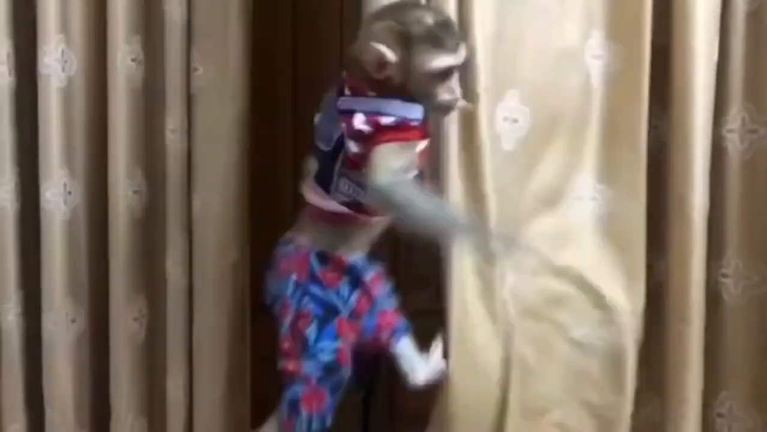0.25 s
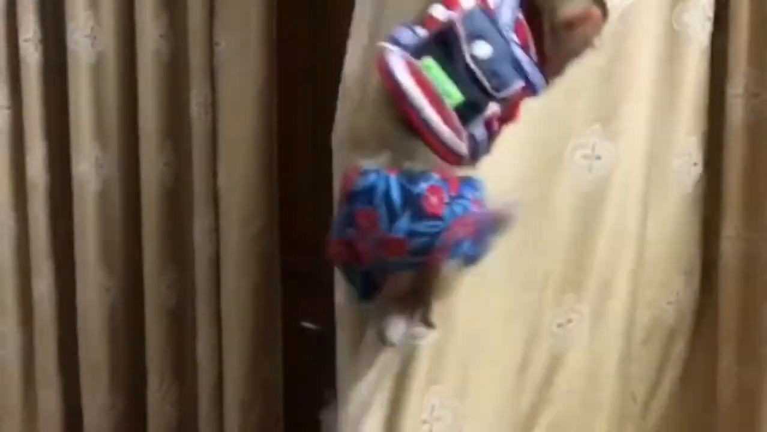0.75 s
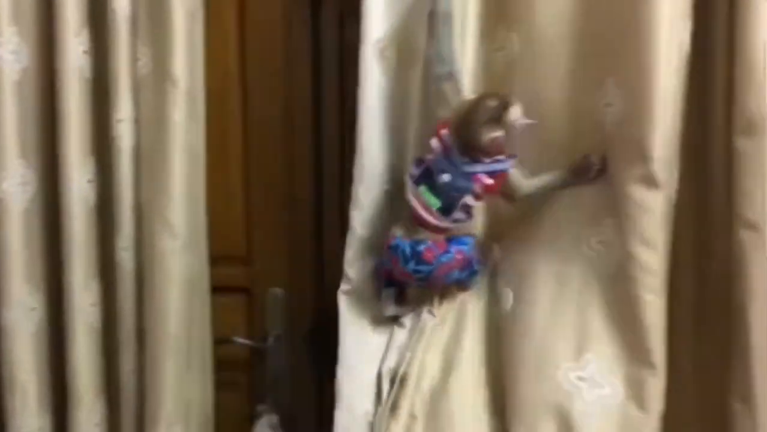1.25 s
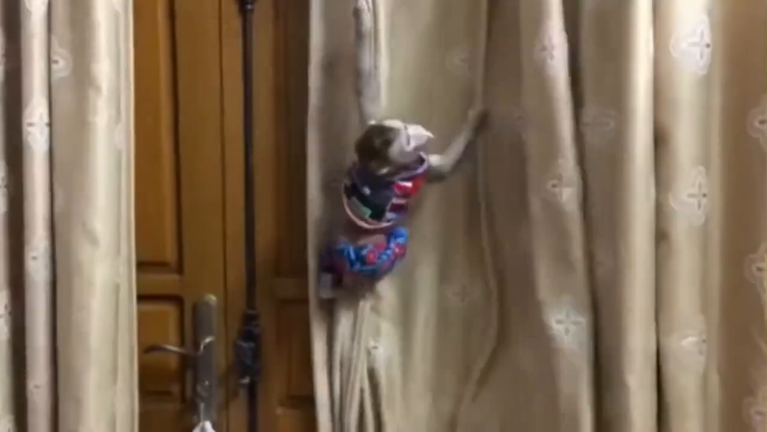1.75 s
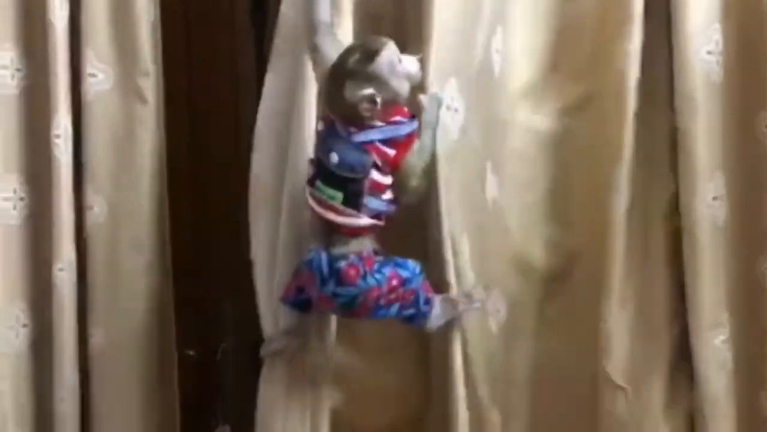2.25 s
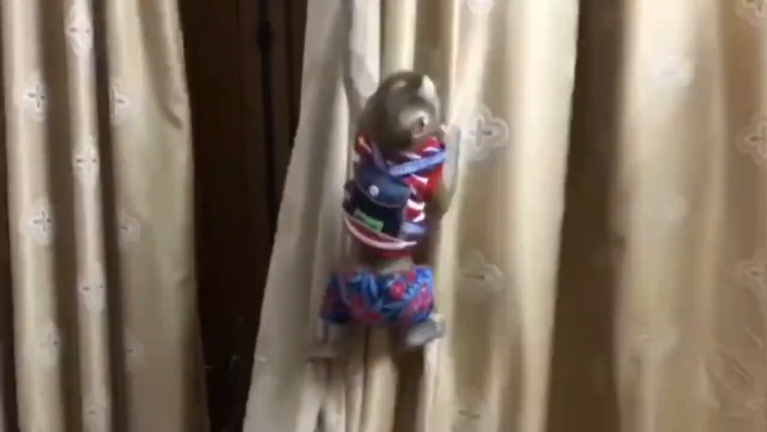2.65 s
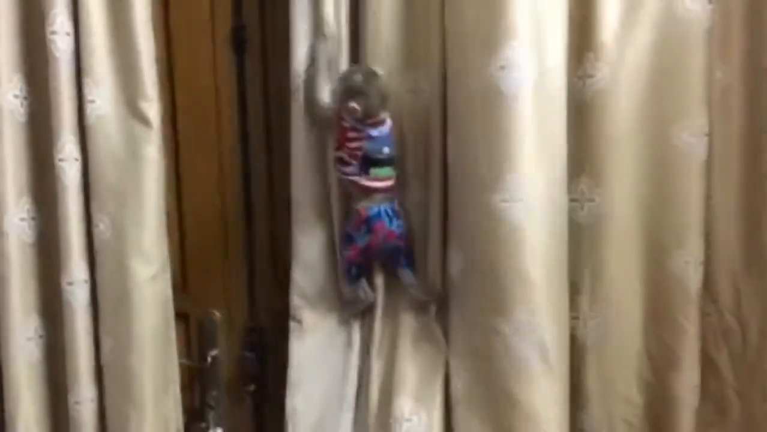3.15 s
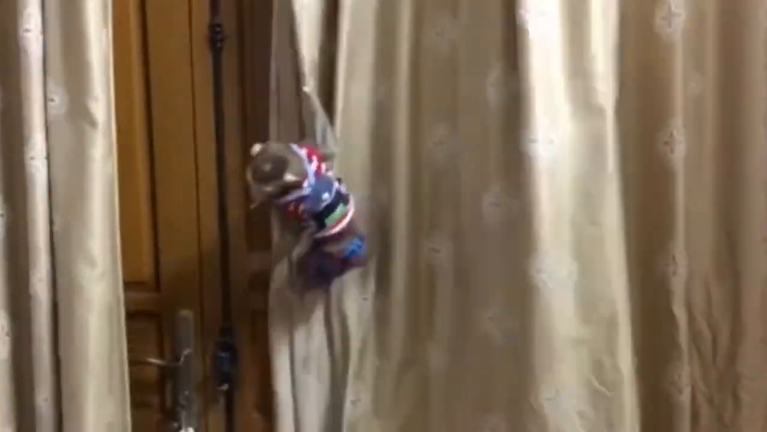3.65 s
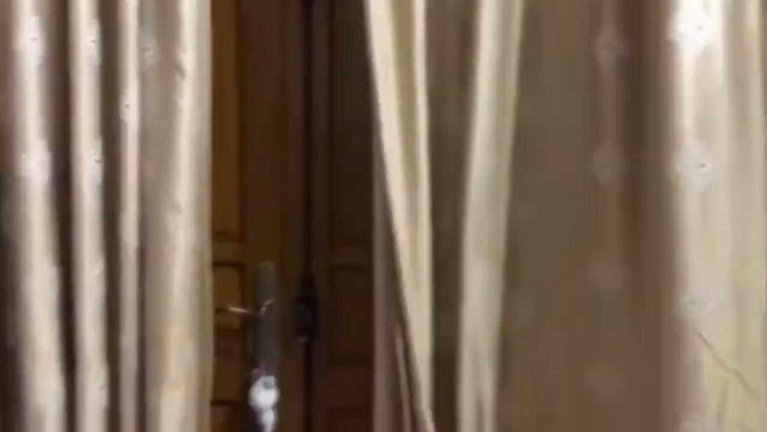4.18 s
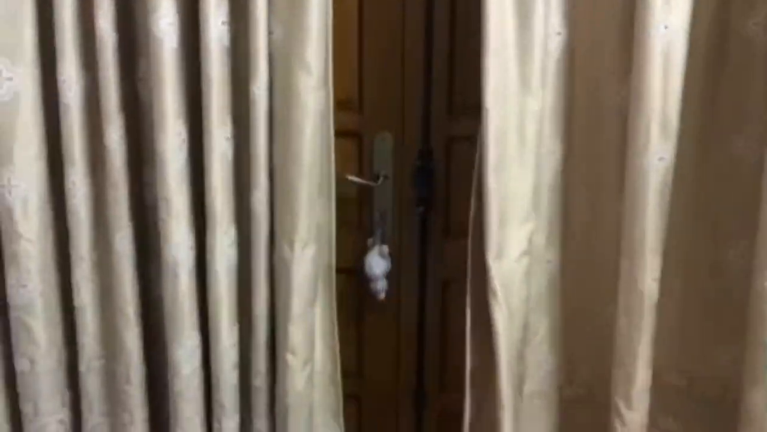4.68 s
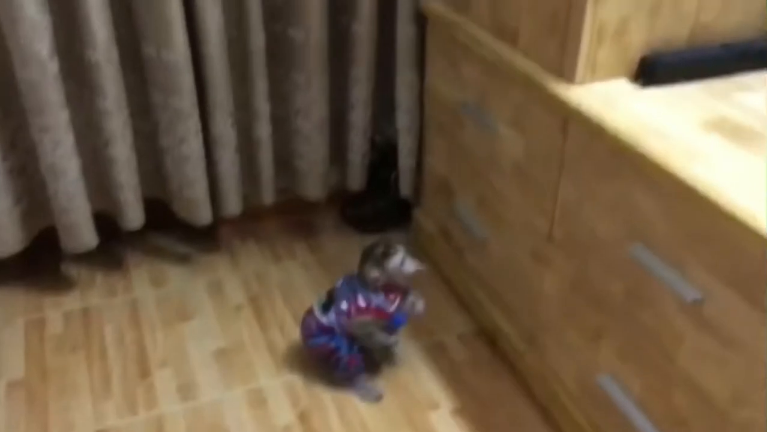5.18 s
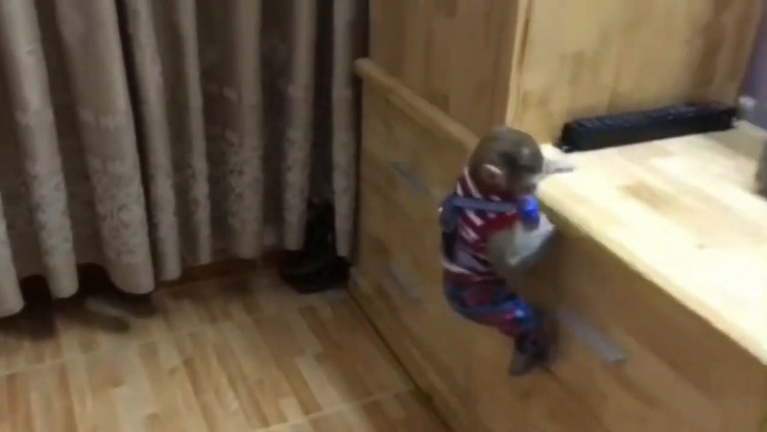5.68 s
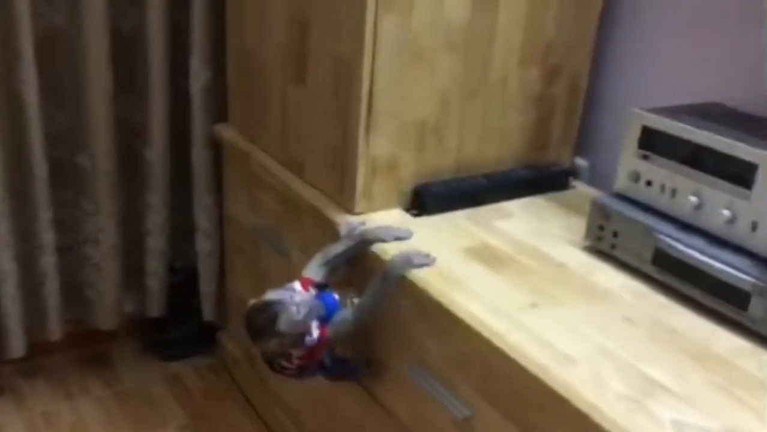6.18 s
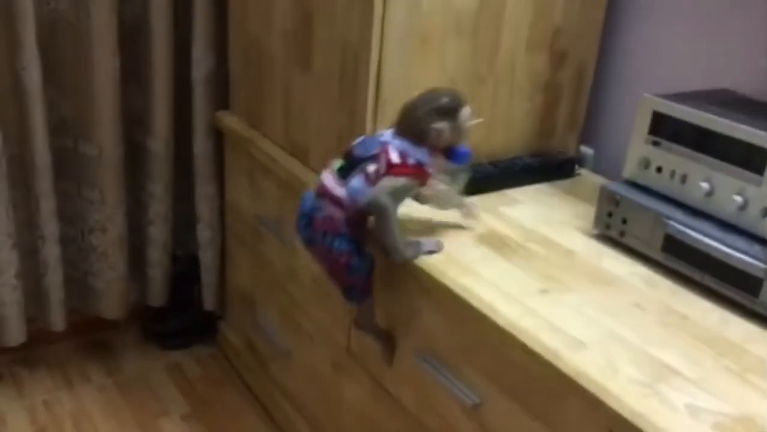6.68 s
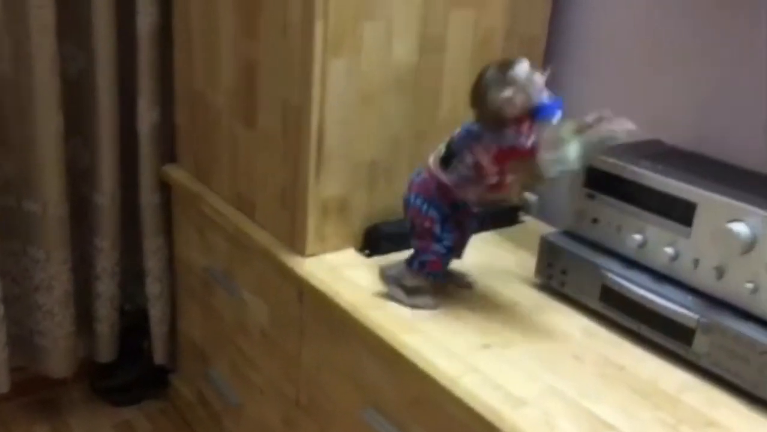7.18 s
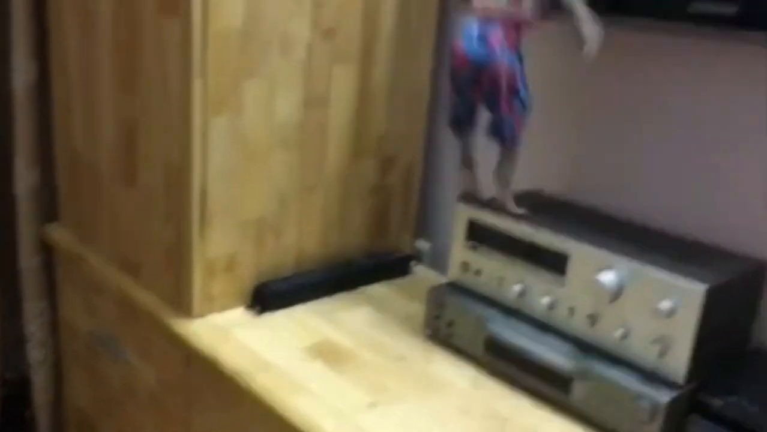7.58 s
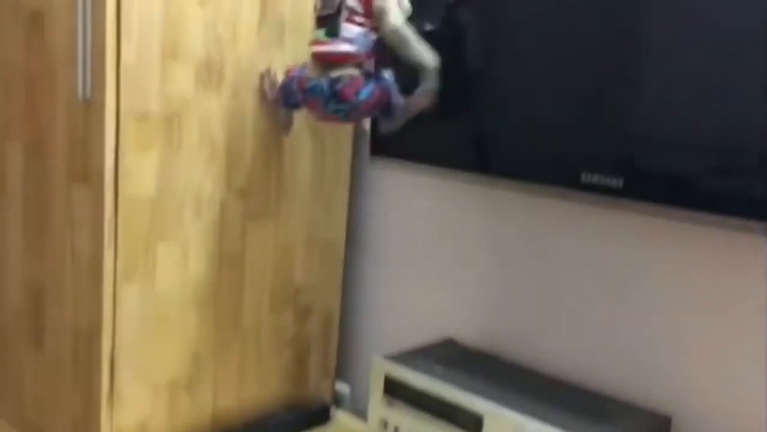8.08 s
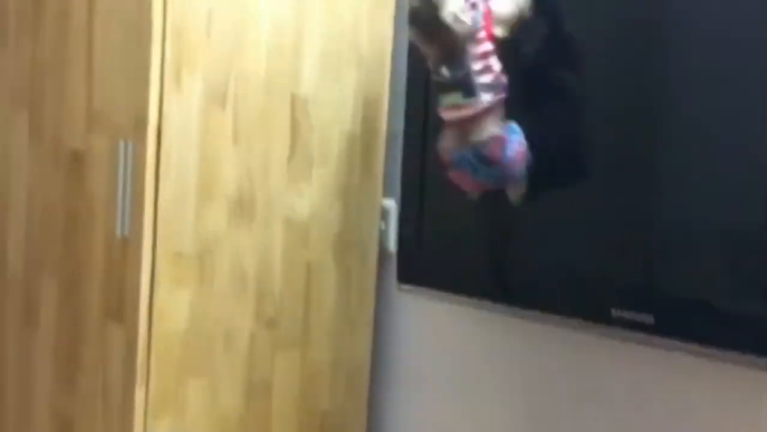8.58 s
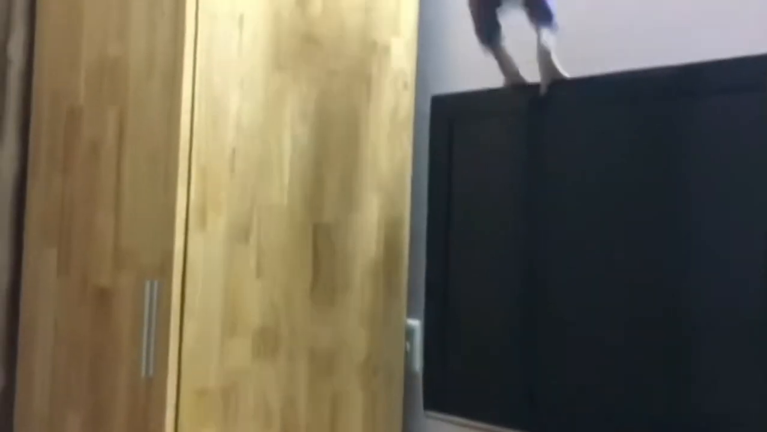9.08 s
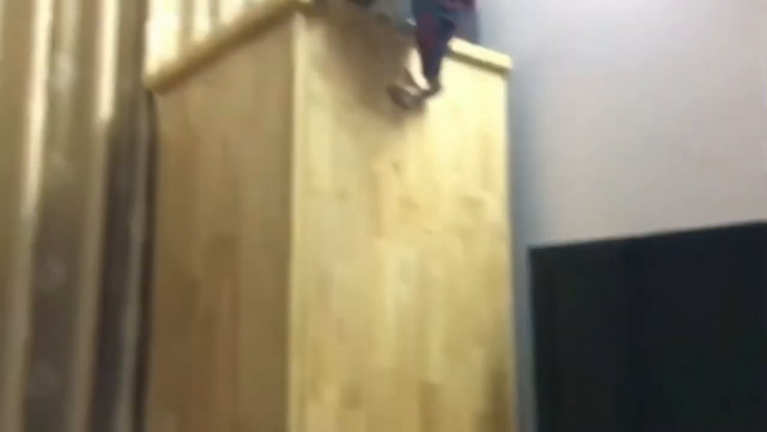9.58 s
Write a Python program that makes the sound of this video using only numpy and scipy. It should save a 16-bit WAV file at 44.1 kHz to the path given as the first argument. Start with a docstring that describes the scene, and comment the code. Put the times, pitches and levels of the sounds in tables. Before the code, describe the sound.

Deep muffled door thumps, a hard floor smack, then light claw ticks, wood knocks and boxy metal bangs over low hum in a live room.

```python
"""A small monkey swings on a curtain against a wooden door, drops to the floor, then climbs a cabinet and a metal case.
Soft blows ring decaying body modes and slap with filtered noise; claws tick, hollow parts knock and cloth rustles.
Shaken woodwork rumbles on, a hard-walled room answers with noise tails, and an appliance hums under it all.
At 4.833 s the level drops at once and comes back in a short fade."""
import sys
import numpy as np
from scipy import signal
from scipy.fft import rfft, irfft
from scipy.io import wavfile
from scipy.ndimage import uniform_filter1d

SR = 44100
rng = np.random.default_rng(int(sys.argv[2]) if len(sys.argv) > 2 else 0)


def put_to_file(sound):
    """Save the sound as 16-bit audio at rate SR, in the file named by the first command-line argument."""
    columns = np.atleast_2d(sound).T  # one column per channel
    safe = np.clip(columns, -1, 1)
    whole_steps = np.round(safe * 32767)
    wavfile.write(sys.argv[1], SR, whole_steps.astype(np.int16))


N = 433944


def undb(db):
    """Decibels to amplitude."""
    return 10 ** (np.asarray(db) / 20)


def unit(x):
    """Scales a signal to an rms of 1."""
    return x / np.sqrt(np.mean(x ** 2))


def band(x, hz, width):
    """Resonance with gain 1 at the centre; never wider than five times its centre."""
    b, a = signal.iirpeak(min(hz, .45 * SR), max(hz / width, .2), fs=SR)
    return signal.lfilter(b, a, x)


def curve(rows):
    """Amplitude over time, joining the listed levels by straight lines in dB."""
    time_s, level_db = np.transpose(rows)
    return undb(np.interp(np.arange(N) / SR, time_s, level_db))


def walk(rate):
    """Random levels held 1 / rate s and slewed; spread near 1."""
    hold = int(SR / rate)
    steps = np.repeat(rng.standard_normal(N // hold + 1), hold)
    return uniform_filter1d(steps, hold)[:N]


def fade(t, t60):
    """Exponential decay that falls 60 dB in t60 s."""
    return np.exp(-np.log(1000) * t / np.clip(t60, .003, 3))


def add(out, start_s, x, peak_db):
    """Places a sound at start_s with the given peak."""
    i = int(start_s * SR)
    out[i:i + len(x)] += (x * undb(peak_db) / np.abs(x).max())[:N - i]


# ringing modes of each struck body: pitch_hz, level_db, t60_s
DOOR = [(50.8, -7, 0.23), (67.3, -0.5, 0.41), (96, -20.5, 0.97), (148, -8, 0.11), (191.8, -2.5, 0.078),
        (294, 0.5, 0.035), (431, -14.5, 0.13), (594, -4, 0.066)]
FLOOR = [(62, -6, 0.27), (93.4, 1, 0.17), (170.6, -4.5, 0.15), (237.4, 1, 0.057), (309, -7, 0.059),
         (472, -4, 0.033), (627, -4, 0.023)]
CABINET = [(60.7, -9, 0.21), (96.5, -4.5, 0.17), (161.3, 0.5, 0.095), (227.7, -1, 0.12),
           (320.4, -3.5, 0.079), (421, -10.5, 0.08), (553, -2.5, 0.054), (818, -7, 0.049),
           (1430, -4.5, 0.028)]
CASE = [(104.3, -4, 0.36), (179.4, 1.5, 0.13), (238.6, 6, 0.11), (298, 5, 0.078), (435, 5, 0.048),
        (556, -11, 0.11), (975, 7, 0.035), (1360, -7, .03), (1710, -13, .03)]
# each body and its place in the room; slaps through the curtain last longer:
# modes, slap_centre_hz, slap_t60_s, echo_db
BODIES = {"door": (DOOR, 910, 0.092, -0.5), "floor": (FLOOR, 1190, 0.05, -9.5),
          "cabinet": (CABINET, 850, 0.07, -6), "case": (CASE, 870, 0.042, -4.5)}
# blows of paw or rump, peaks before the room:
# start_s, body, body_peak_db, struck_patch_hz, slap_peak_db, hiss_peak_db
BLOWS = [(.065, "door", -19, 166, -26.5, -59), (.191, "door", -24, 142, -34.5, -45.5),
         (0.302, "door", -21, 136, -33.5, -55), (1.059, "door", -36.5, 174, -52, -67),
         (1.386, "door", -10.5, 182, -22, -30), (1.406, "door", -13, 95, -22.5, -21),
         (1.425, "door", -28, 200, -30.5, -39), (1.569, "door", -25, 81, -33.5, -58),
         (1.958, "door", -30.5, 133, -42.5, -68), (3.32, "door", -34.5, 74, -41, -53),
         (3.662, "door", -29.5, 61, -53, -54), (4.187, "floor", -22.5, 187, -22, -26),
         (4.203, "floor", -15.5, 262, -17, -22), (4.228, "floor", -12.5, 78, -37, -32),
         (4.467, "floor", -45, 300, -44, -50), (4.48, "floor", -36.5, 132, -41.5, -50),
         (4.593, "floor", -29.5, 400, -32, -33), (4.743, "floor", -60, 230, -36.5, -40),
         (5.507, "cabinet", -31, 187, -37, -41.5), (5.58, "cabinet", -29, 68, -40.5, -47),
         (5.71, "cabinet", -35, 141, -47, -63), (6.165, "cabinet", -31, 152, -46.5, -47),
         (6.225, "cabinet", -31, 119, -51, -51), (6.258, "cabinet", -32.5, 111, -57, -64),
         (7.008, "cabinet", -33.5, 160, -44.5, -50), (7.085, "cabinet", -32, 205, -46, -55),
         (7.125, "cabinet", -36.5, 141, -54, -65), (7.265, "case", -27, 187, -34.5, -41.5),
         (7.374, "case", -52, 325, -33, -30.5), (7.446, "case", -30, 429, -29, -31),
         (7.474, "case", -13, 181, -16, -18), (7.533, "case", -21.5, 560, -23.5, -21.5),
         (7.623, "case", -10, 368, -20, -28.5), (7.66, "case", -23, 200, -20.5, -30),
         (7.684, "case", -16, 162, -25.5, -33), (7.744, "case", -23.5, 132, -27, -48),
         (7.796, "case", -34, 230, -38, -37), (8.258, "cabinet", -38, 492, -35, -56),
         (8.352, "cabinet", -27, 490, -25.5, -35.5), (8.364, "cabinet", -28, 300, -27, -40),
         (8.444, "cabinet", -18, 905, -20.5, -30.5), (8.5, "cabinet", -25, 75, -42, -43),
         (8.572, "cabinet", -22.5, 133, -38, -37.5), (8.928, "cabinet", -35, 429, -42, -50),
         (8.997, "cabinet", -35, 746, -41, -50), (9.129, "cabinet", -41.5, 492, -39, -47),
         (9.313, "cabinet", -35, 325, -33.5, -43), (9.343, "cabinet", -28, 66, -44, -59)]


def blows(body, spot_db=3.5, spread=0.1093, swell_cycles=1.0):
    """A paw or rump rings the body, each time at another spot; skin and cloth slap on top."""
    out, t = np.zeros(N), np.arange(SR // 2) / SR
    modes, slap_hz, slap_t60, echo_db = BODIES[body]
    # panels crowd several modes round each listed one
    hz, mode_db, t60 = np.repeat(np.transpose(modes), repeats=6, axis=1)[..., None]
    slap_range = signal.butter(2, [330, 2600], "band", fs=SR)
    for start_s, struck, body_db, patch_hz, slap_db, hiss_db in BLOWS:
        if struck != body:
            continue
        spot, shift = rng.standard_normal((2, len(hz), 1))
        # modes near the pitch of the struck patch ring strongest
        ratio = hz / patch_hz
        size = undb(mode_db + spot_db * spot) * ratio ** 1.5 / (1 + ratio ** 3)
        # low modes need a cycle or so to get the whole panel moving
        shape = fade(t, t60) * (1 - np.exp(-t * hz / swell_cycles))
        tones = np.sin(2 * np.pi * hz * (1 + spread * shift) * t)
        add(out, start_s, np.sum(size * shape * tones, axis=0), body_db)

        # coarse level steps, 100 samples each, roughen slap and hiss alike
        steps = np.repeat(rng.standard_normal(len(t) // 100 + 1), repeats=100)[:len(t)]
        slap_shape = undb(3.06 * steps) * fade(t, slap_t60) * (1 - np.exp(-t / 0.0022))
        slap_noise, hiss_noise = rng.standard_normal((2, len(t))) * slap_shape
        slap = band(signal.lfilter(*slap_range, slap_noise), slap_hz, 1.2 * slap_hz)
        add(out, start_s, slap, slap_db)
        hiss = band(band(hiss_noise, 3650, 4500), 3500, 17500)
        add(out, start_s, hiss, hiss_db)
    return room(out, echo_db)


# claw and buckle ticks, peaks before the room: start_s, ring_peak_db, ring_hz, scratch_peak_db
TICKS = [(0.083, -31, 3720, -59), (1.949, -43.5, 3280, -60), (3.8457, -48, 3460, -55),
         (4.3885, -63, 3640, -42), (4.4587, -50, 3350, -48), (4.7602, -40.5, 4000, -34.5),
         (4.9137, -47, 6230, -59), (4.969, -45.5, 2300, -47), (5.2106, -45.5, 4170, -64),
         (5.461, -46.5, 7960, -52), (5.541, -47.5, 5800, -60), (5.893, -49.5, 9000, -58),
         (5.6278, -39, 3220, -57), (5.6498, -47, 3320, -43), (5.728, -40, 8380, -44),
         (5.7461, -39.5, 3230, -35), (5.907, -34.5, 5300, -42.5), (6.0867, -47, 7500, -46),
         (6.2774, -48, 2350, -44.5), (6.4296, -33, 2470, -45), (6.524, -34, 3980, -48),
         (6.5794, -54, 3840, -42), (6.7286, -45, 6000, -39), (7.1843, -52, 5800, -42),
         (7.2952, -41, 9280, -37), (7.4127, -34.5, 3380, -28), (7.864, -36.5, 3100, -58),
         (7.9807, -44, 2380, -48), (8.625, -28.5, 6500, -27.5), (8.877, -42, 4130, -42),
         (9.2594, -45, 5100, -47)]
TICK_T60_S = 0.018


def ticks():
    """Claws and buckles catch: a short bright ring of narrowed noise with a wide scratch."""
    out, t = np.zeros(N), np.arange(SR // 4) / SR
    shape = fade(t, TICK_T60_S) * (1 - np.exp(-t / 0.0026))
    for start_s, ring_db, ring_hz, scratch_db in TICKS:
        ring_noise, scratch_noise = rng.standard_normal((2, len(t))) * shape
        ring = band(band(ring_noise, ring_hz, .5 * ring_hz), ring_hz, .5 * ring_hz)
        add(out, start_s, ring, ring_db)
        add(out, start_s, band(scratch_noise, 3000, 14000), scratch_db)
    return out


# small hollow knocks with one note, peaks before the room:
# start_s, peak_db, pitch_hz, rough_db (gain of the noise round the note)
HOLLOW_KNOCKS = [(5.098, -47, 724, 4), (5.838, -43.5, 1185, 17), (6.104, -37, 1227, 17),
                 (6.406, -43, 1010, 16), (6.527, -43, 1643, 8), (7.376, -29.5, 713, 1),
                 (8.664, -33, 1658, 12), (8.771, -42, 2060, 8), (8.854, -39, 2020, 14),
                 (9.429, -39, 742, 4)]
HOLLOW_T60_S = 0.088


def hollow_knocks():
    """Small hollow parts give one rough note: a sine with noise resonating round it."""
    out, t = np.zeros(N), np.arange(SR // 4) / SR
    shape = fade(t, HOLLOW_T60_S) * (1 - np.exp(-t / 0.0011))
    for start_s, peak_db, hz, rough_db in HOLLOW_KNOCKS:
        noise = rng.standard_normal(len(t))
        rough = undb(rough_db) * band(band(noise, hz, 0.66 * hz), hz, 0.66 * hz)
        note = np.sin(2 * np.pi * hz * t) + rough
        add(out, start_s, note * shape, peak_db)
    return out


# feet and cloth dragged over a surface, rms before the swell and the room: middle_s, level_db, half_length_s
SCUFFS = [(0.755, -62, 0.063), (1.033, -63.5, 0.066), (3.34, -58, 0.028), (3.776, -60, 0.12),
          (3.85, -53.5, 0.035), (4.728, -56.5, 0.15), (7.27, -58, .076), (7.564, -42.5, 0.074),
          (7.677, -47.5, .13), (8.245, -57, 0.064), (8.646, -46.5, 0.081), (8.773, -51, 0.1),
          (8.898, -44.5, 0.047), (9.12, -61.5, 0.1), (9.348, -57, .17)]
SCUFF_HZ, SCUFF_WIDTH_HZ = 1940, 3900
RUSTLE_DB = -67.5  # rms of the steady rustle before the room


def rustle():
    """Dense noise grains of cloth and fur, always faintly there and swelling at each drag."""
    grains = rng.standard_normal(N) * undb(4.6 * walk(400) + 4.7 * walk(40))
    steady = rng.standard_normal(N) * undb(2.0 * walk(15))
    out = undb(RUSTLE_DB) * unit(band(steady, 1600, 8000))
    for middle_s, level_db, half_length_s in SCUFFS:
        count = int(half_length_s * SR)
        i = int(middle_s * SR) - count
        drag = unit(band(grains[i:i + 2 * count], SCUFF_HZ, SCUFF_WIDTH_HZ))
        out[i:i + 2 * count] += undb(level_db) * np.hanning(2 * count) * drag
    return out


# level of the shaken woodwork: time_s, level_db
RUMBLE = [(0.0, -37), (0.33, -32.5), (0.87, -40.5), (1.4, -56), (1.56, -26.5), (2.57, -52), (4.44, -45),
          (4.77, -53), (5.15, -46.5), (7.89, -43.5), (8.88, -55.5), (9.84, -46.5)]
# resonances of door, boards and panels: pitch_hz, width_hz (per filter pass), level_db
WOODWORK = [(43, 10, -4.5), (71.5, 10.7, -4.5), (98.2, 61, -3.5), (149, 45, -10.5), (325, 89, -21)]


def rumble():
    """Door, boards and panels keep shaking: throbbing noise drives low resonances."""
    shake = rng.standard_normal(N) * undb(3.0 * walk(18))
    panels = np.zeros(N)
    for hz, width, level_db in WOODWORK:
        panels += undb(level_db) * unit(band(band(shake, hz, width), hz, width))
    return curve(RUMBLE) * unit(panels)


# appliance hum lines: pitch_hz, width_hz (per filter pass), level_db (rms)
HUM = [(110.5, 4.3, -53), (164.6, 15, -57.5), (220.2, 23, -61.5), (288, 24, -70), (556.4, 29, -69)]


def hum():
    """An appliance hums in wavering lines, each a noise through a narrow resonance."""
    out = np.zeros(N)
    for hz, width, level_db in HUM:
        out += undb(level_db) * unit(band(band(rng.standard_normal(N), hz, width), hz, width))
    return out


# spectrum of the air noise: pitch_hz, level_db (relative, per Hz)
AIR = [(18, -34), (30, -8.5), (118, 7.5), (157, -19), (328, -7.5), (415, -16.5), (540, -15), (740, -19),
       (1960, -20.5), (2680, -25), (5040, -36), (12600, -100), (16000, -56)]
AIR_DB = -49  # rms


def air():
    """Broad air noise: white noise shaped to a smooth spectrum."""
    hz = np.fft.rfftfreq(N, 1 / SR) + 1
    pitch_hz, level_db = np.transpose(AIR)
    gain = undb(np.interp(np.log(hz), np.log(pitch_hz), level_db))
    return undb(AIR_DB) * unit(irfft(rfft(rng.standard_normal(N)) * gain, N))


# decay of the hard-walled room: pitch_hz, t60_s
ROOM_T60 = [(60, 0.49), (250, 0.56), (1000, 0.48), (4000, 0.51), (12000, 0.13)]


def room(x, echo_db):
    """Diffuse echoes build up over a few ms and die fastest in the top treble; each place has its own."""
    t = np.arange(SR) / SR
    pitch_hz, t60_s = np.transpose(ROOM_T60)
    tail = np.zeros(SR)
    for hz in 45 * 2 ** np.arange(0, 8.6, .5):  # half-octave steps
        t60 = np.interp(np.log(hz), np.log(pitch_hz), t60_s)
        tail += band(rng.standard_normal(SR), hz, hz / 2) * fade(t, t60)
    tail = tail * (1 - np.exp(-t / 0.0047))
    tail = tail / np.sqrt(np.sum(tail ** 2))
    return x + undb(echo_db) * signal.fftconvolve(x, tail)[:N]


def scene():
    """Blows on each body, small sounds in the room, shaken woodwork, hum and air."""
    struck = sum(blows(body) for body in BODIES)
    small = room(ticks() + hollow_knocks() + rustle(), -5.5)  # echo in dB
    return (struck + small + rumble() + hum() + air())[None]


# dips from the microphone port: pitch_hz, width_hz, depth_db
MIC_DIPS = [(2730, 540, -5.5), (4990, 520, -4), (10470, 350, -19.5)]
DROP_S, FADE_IN_S = 4.833, .032
TOP_HZ = 15900
CEILING = 1  # full scale


def record(dry):
    """Bass roll-off and port dips of the microphone, rounded peaks, a drop with a fade-in, and the top cut."""
    x = signal.sosfilt(signal.butter(2, 48, "high", fs=SR, output="sos"), dry)
    for hz, width, depth_db in MIC_DIPS:
        x = x - (1 - undb(depth_db)) * band(x, hz, width)
    x = CEILING * np.tanh(x / CEILING)
    since = np.arange(N) / SR - DROP_S
    x = x * np.where(since < 0, 1, np.clip(since / FADE_IN_S, .03, 1))
    return signal.sosfilt(signal.ellip(10, .2, 80, TOP_HZ, fs=SR, output="sos"), x)


dry = scene()
out = record(dry)
put_to_file(out)
```